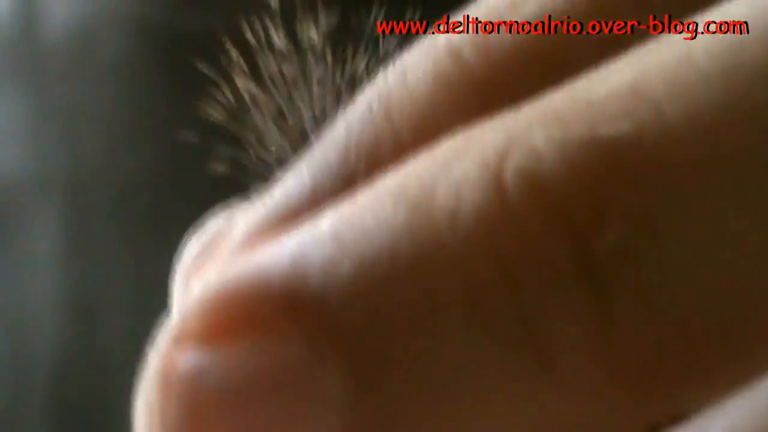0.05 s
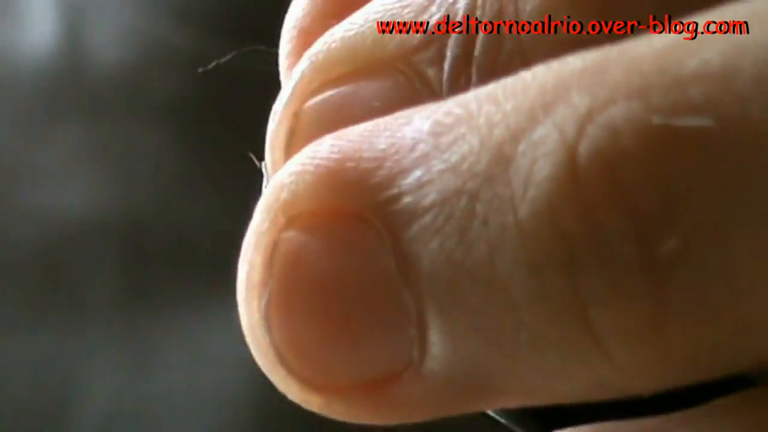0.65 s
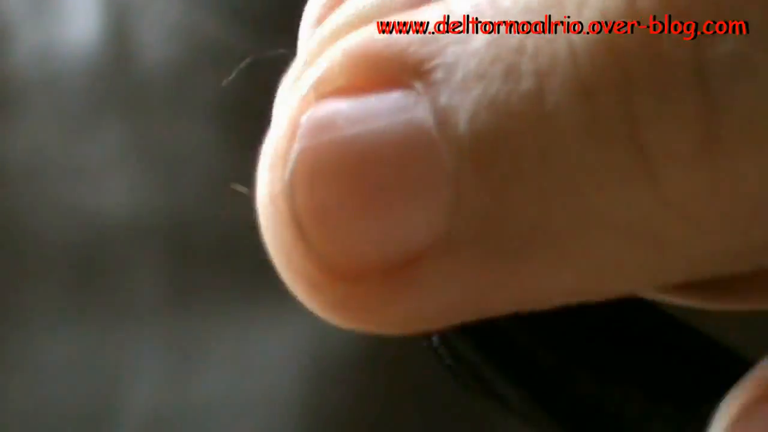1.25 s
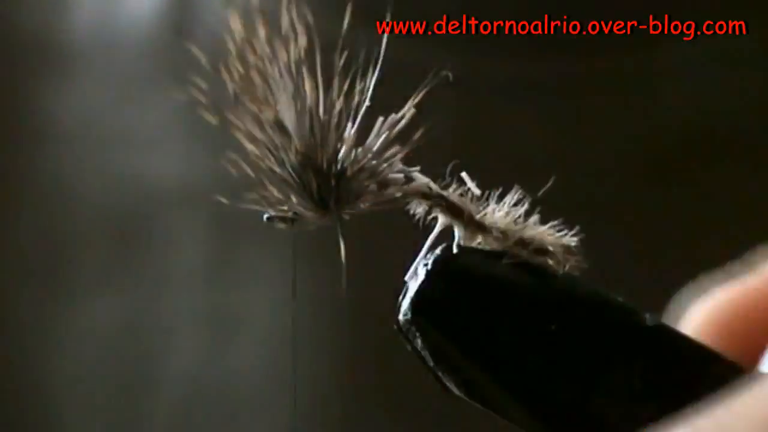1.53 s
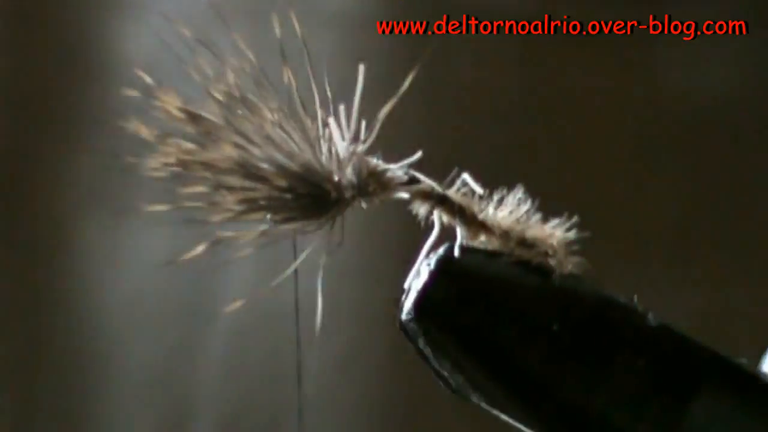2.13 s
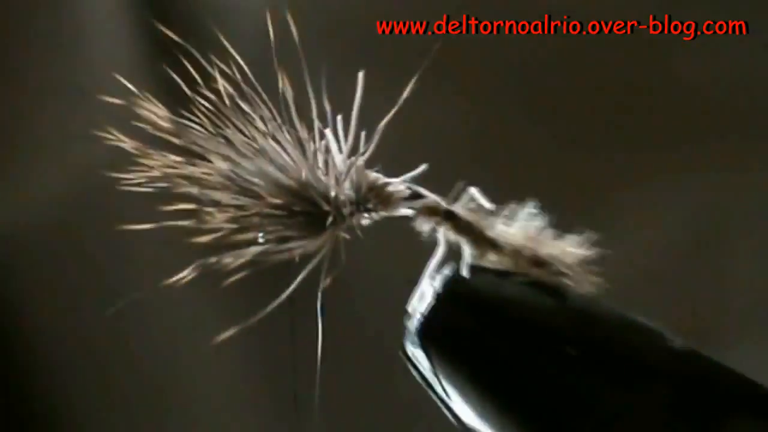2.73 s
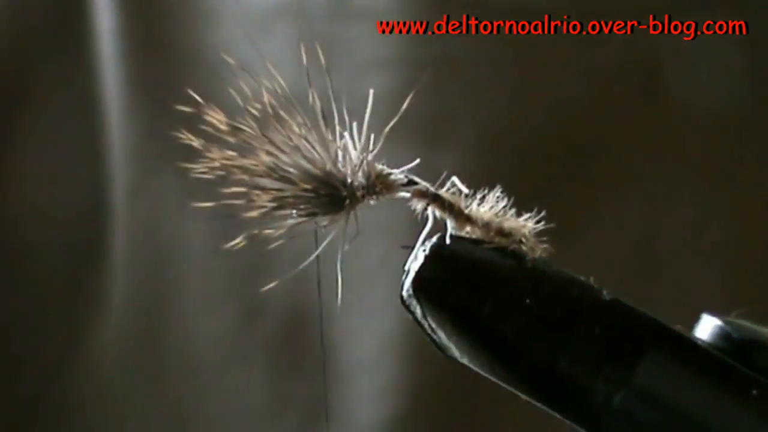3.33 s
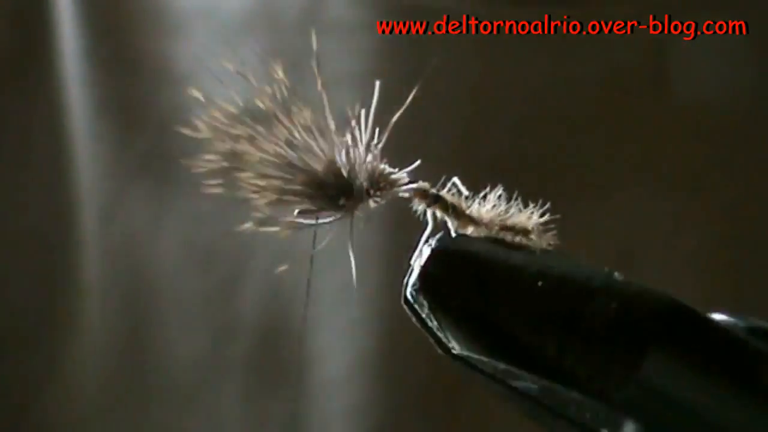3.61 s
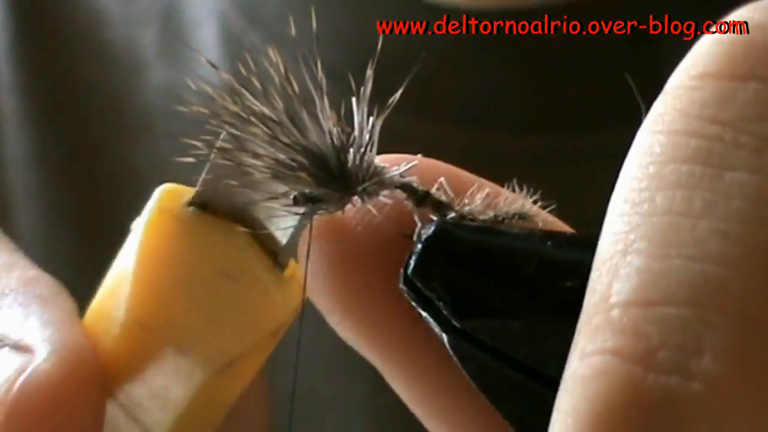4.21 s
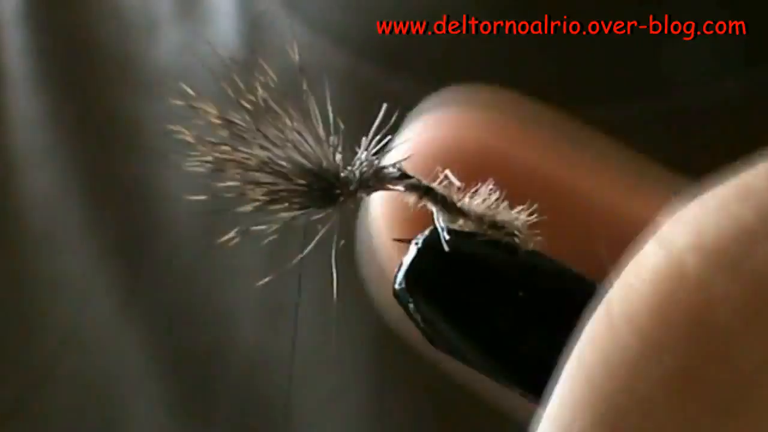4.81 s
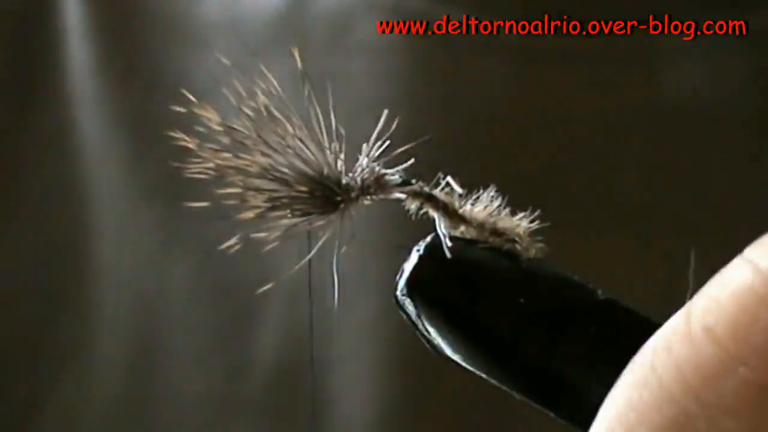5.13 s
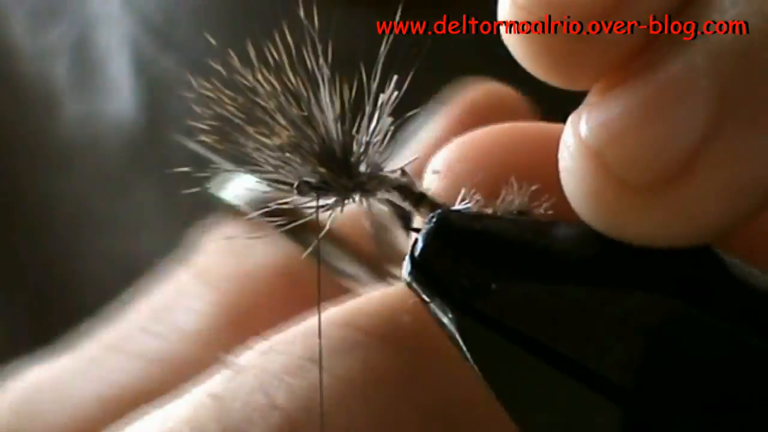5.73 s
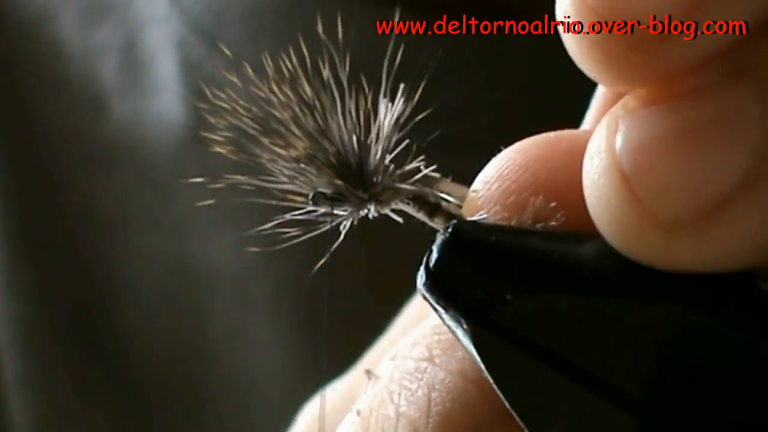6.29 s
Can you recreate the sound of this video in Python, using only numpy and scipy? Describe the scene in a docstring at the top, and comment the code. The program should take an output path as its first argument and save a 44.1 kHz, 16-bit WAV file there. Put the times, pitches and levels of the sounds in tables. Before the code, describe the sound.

A quiet, fairly dry room with a soft rumble and faint high pips is heard through two spaced microphones. From about 0.6 to 0.8 seconds comes the loudest event: small metal tools drag and clatter on a table, chattering over dull thuds and cutting off abruptly. Light ticks and soft knocks follow at about 1, 1.3 and 1.9 seconds. Between 2.3 and 3.2 seconds there is faint, dull rubbing with small clicks and two brief hisses of gliding metal. Sharper, briefly ringing taps and tiny slides run from 3.2 to 3.9 seconds, ending in another fine hiss. A few thin ticks lead to a tabletop thud at 4.8 seconds. From 5 to 5.3 seconds a second loud clatter of short scrapes and knocks follows. After one soft knock near 5.5 seconds, only the room remains until about 6.4 seconds.

```python
"""Small metal tools are picked up, dragged and put down on a table beside a fly-tying vise.
A sliding tool chatters, and the sound cuts off abruptly. Single contacts tick and ring briefly,
and the tabletop thuds under them. Things rub softly, and gliding metal hisses.
The room is quiet and fairly dry, with a soft rumble and faint high pips; two spaced microphones hear it."""
import sys
import numpy as np
from scipy import signal
from scipy.fft import rfft, irfft
from scipy.io import wavfile
from scipy.ndimage import uniform_filter1d

SR = 44100
rng = np.random.default_rng(int(sys.argv[2]) if len(sys.argv) > 2 else 0)


def transcribe(signal):
    """Save signal, clipped to [-1, 1], as a 16-bit WAV file at the path in sys.argv[1]."""
    frames = np.atleast_2d(signal).T
    limited = np.clip(frames, -1, 1)
    pcm = np.round(limited * 32767).astype(np.int16)
    wavfile.write(sys.argv[1], SR, pcm)


N = 280476

# Single contacts of a tool. Each row: start in seconds, seconds to fade by 60 dB, level in dB,
# wooden lows in dB, steely highs in dB, ring pitch in Hz, ring strength in dB.
CONTACTS = [(0.6496, 0.04, -21.5, 7, 0, 1960, 13), (0.6785, 0.016, -19.5, 10.5, -13, 2145, 18.5),
            (0.796, 0.036, -24, 4, -10, 953, 19), (1.0146, 0.036, -34.5, 7, 13, 4170, 14.5),
            (1.346, 0.075, -52, 15, 16, 9000, 6), (1.924, 0.069, -49.5, 29, 16, 3010, 14),
            (2.344, 0.088, -43.5, 24.5, 18, 855, 8.5), (2.371, 0.044, -45, -19, -34, 2540, 13),
            (2.526, 0.054, -51, 3, -1, 2440, 15), (2.554, 0.028, -39.5, -12, -10, 1860, 13),
            (2.686, 0.07, -42.5, -10, -29, 2340, 13), (2.849, 0.029, -53.5, -4, 7, 4350, 5),
            (3.048, 0.036, -57.5, 3, 32, 860, 16), (3.27, 0.064, -32.5, 7.5, -10, 1126, 17.5),
            (3.381, 0.086, -37, 23, -24, 1060, 9.5), (3.606, 0.031, -44, 11, -18, 1970, 13),
            (3.671, 0.021, -35, -5, 9.5, 2925, 20), (3.684, 0.045, -41.5, 6, 14.5, 6800, 7),
            (3.781, 0.048, -39.5, -14, 18.5, 7560, 9.5), (3.928, 0.052, -52, 10, 0, 4000, 22),
            (4.137, 0.033, -49.5, -3, 18, 5470, 11.5), (4.528, 0.026, -47.5, -38, 21.5, 4070, 16),
            (4.728, 0.032, -42, 2, 18.5, 3640, 17), (4.96, 0.12, -50, -9, 8, 3920, 14),
            (5.188, 0.074, -29.5, 9.5, 1.5, 1110, 12), (5.461, 0.075, -48.5, 19.5, 18, 7440, 5)]


def amp(db):
    """Turns decibels into a gain."""
    return 10 ** (np.asarray(db) / 20)


def evened(x):
    """Scales a signal to an average (rms) level of 1."""
    return x / np.sqrt(np.mean(x ** 2) + 1e-20)


def read(points, hz):
    """Reads between the rows of a table, on a log-frequency axis."""
    f, value = np.transpose(points)
    return np.interp(np.log(hz + 1), np.log(f + 1), value)


def add(mix, start, sound):
    """Mixes a stereo sound in at a start time in seconds."""
    part = mix[:, max(round(start * SR), 0):][:, :sound.shape[1]]
    part += sound[:, :part.shape[1]]


def tint(x, gain_db, size=4096):
    """Filters a sound by a curve that gives dB for each frequency."""
    cepstrum = irfft(np.log(amp(gain_db(np.fft.rfftfreq(size, 1 / SR)))))
    # folded so that the filter rings only after a blow, never before it
    cepstrum[1:size // 2] *= 2
    cepstrum[size // 2 + 1:] = 0
    response = irfft(np.exp(rfft(cepstrum)))
    return signal.fftconvolve(x, response[None], axes=1)[:, :x.shape[1]]


def peak(f, hz, width):
    """The power of one resonance, 1 at its centre."""
    return 1 / (1 + (2 * (f - hz) / width) ** 2)


def placed(x, db, pan_db, span):
    """Sets the level over the first span seconds, and how much louder the left side is."""
    rms = np.sqrt(np.mean(x[:, :round(span * SR)] ** 2, axis=1, keepdims=True))
    return x / rms * amp(db + np.array([[pan_db], [-pan_db]]) / 2)


def held(t, length, rise, stop):
    """A level that rises, holds and falls away; all times are in seconds."""
    return np.minimum(t / rise, 1) * np.exp(-np.maximum(t - length, 0) / stop)


def grainy(grain_db, size=300):
    """Noise whose strength flickers, in grains about size samples long."""
    noise, bumps = rng.standard_normal((2, N)), rng.standard_normal(N)
    return noise * amp(grain_db * evened(uniform_filter1d(bumps, size)))


def background(level_db=-57.3, patchy_db=1.18, lumpy_db=0.8, rumble_hz=300):
    """The room hisses softly over a rumble that comes in lumps."""
    # The room at rest. Each row: frequency in Hz, relative level in dB.
    colour = [(25, -24), (60, 5.5), (110, -0.5), (200, 2.5), (340, -12.5), (520, -9.5), (760, -6),
              (970, -2.5), (1250, -8), (2000, -11), (3700, -16.5), (4900, -15.5), (7000, -19.5),
              (15000, -25.5)]
    # How alike the two sides are. Each row: frequency in Hz, likeness from 0 to 1.
    likeness = [(50, 0.96), (200, 0.32), (450, 0.066), (1500, 0.22), (4000, 0.046)]
    frames, hz = N // 256 + 5, np.fft.rfftfreq(1024, 1 / SR)
    a, b, c, d, patches = rng.standard_normal((5, frames, len(hz))).transpose(0, 2, 1)
    patches = uniform_filter1d(patches, size=16, axis=0)  # smooth across frequency
    patches = evened(uniform_filter1d(patches, size=12, axis=1))  # and across time
    same = np.clip(read(likeness, hz), -1, 1)[:, None]
    left = a + 1j * b
    right = same * left + np.sqrt(1 - same ** 2) * (c + 1j * d)
    depth_db = patchy_db + lumpy_db / (1 + (hz / rumble_hz) ** 4)
    spectra = np.array([left, right]) * amp(read(colour, hz)[:, None] + depth_db[:, None] * patches)
    return amp(level_db) * evened(signal.istft(spectra, nperseg=1024, noverlap=768)[1][:, :N])


def pips(hz=2395, spread_hz=30, length=0.022, clear_db=-53.5, weak_db=-59, weak_count=22,
         phase_spread=0.27, octave_db=-18, flutter_db=-71, flutter_width_hz=110):
    """Short soft tones, all near one pitch, sound over a faint flutter at that pitch."""
    # The clearest pips. Each entry: the middle of a pip in seconds.
    times = [0.249, 0.378, 0.998, 1.184, 1.438, 1.484, 1.67, 1.782, 1.805, 1.847, 1.974, 2.0, 2.033, 2.296,
             3.231, 3.554, 3.733, 5.452, 5.659]
    out, t = np.zeros((2, N)), np.arange(round(length * SR)) / SR
    events = [(middle, clear_db) for middle in times]
    events += [(middle, weak_db) for middle in rng.uniform(times[0], times[-1], weak_count)]
    for (middle, db), (detune, left, right) in zip(events, rng.standard_normal((len(events), 3))):
        angle = 2 * np.pi * (hz + spread_hz * detune) * t + phase_spread * np.array([[left], [right]])
        tone = np.sin(angle) + amp(octave_db) * np.sin(2 * angle)
        add(out, middle - length / 2, amp(db) * tone * np.hanning(len(t)))
    flicker = grainy(grain_db=5.5, size=700)
    flutter = tint(flicker, lambda f: np.maximum(20 * np.log10(peak(f, hz, flutter_width_hz)), -80))
    return out + amp(flutter_db) * evened(flutter)


def scatter(t, fade_s):
    """Dense echoes from the table and the things on it, different at each microphone."""
    return rng.standard_normal((2, len(t))) * amp(-60 * t / fade_s)


def chatter(t, slips_per_s=4500, spread_db=3.5, fade_s=0.012, dwell_s=0.017, lowest_hz=170):
    """A sliding tool catches and slips in quick uneven blows; each spot it passes echoes differently."""
    chance, size, sign = rng.random((3, SR // 2))[:, :len(t)]
    strength = amp(spread_db * np.minimum(-np.log(size), 3))
    slips = (chance < slips_per_s / SR) * strength * np.sign(sign - .5)
    spot = np.floor(t / dwell_s)
    echoes = [scatter(t[:800], fade_s) for _ in range(20)]
    blows = sum(signal.fftconvolve((slips * (spot == k))[None], echo, axes=1)
                for k, echo in enumerate(echoes))
    return signal.sosfilt(signal.butter(2, lowest_hz, "high", fs=SR, output="sos"), blows[:, :len(t)])


def tool_ring(blows, low_db, high_db, ring_hz, ring_db, ring_q=26, grip_hz=70, modes_db=2,
              overtone=1.47, overtone_db=-8):
    """Blows ring the tool, the table and two resonances of the spot struck; the grip damps them all."""
    # Resonances of tools on the table. Each row: pitch in Hz, undamped width in Hz, relative dB.
    resonances = [(955, 27, -18), (2112, 120, 0), (2740, 63, -2), (2940, 180, -1.5), (3860, 130, -6),
                  (4150, 23.7, -13), (4790, 210, -2), (4930, 170, -10), (5250, 120, -9.5), (6500, 210, -4)]
    # The tone colour of a contact. Each row: frequency in Hz, relative level in dB.
    colour = [(120, -4.5), (260, -5.5), (380, -15.5), (500, -6.5), (630, -9.5), (1000, 4), (1600, -0.5),
              (2100, 0.5), (2700, -1.5), (4500, -3.5), (6500, -9.5), (10000, -19.5), (12500, -31.5),
              (16000, -38)]

    def gain_db(f):
        modes = sum(amp(db + modes_db) ** 2 * peak(f, hz, width + grip_hz)
                    for hz, width, db in resonances)
        width = ring_hz / ring_q + grip_hz
        ring = peak(f, ring_hz, width) + amp(overtone_db) ** 2 * peak(f, ring_hz * overtone, width)
        # a light, hard contact is brief, so its lift keeps growing toward the top
        hardness = [(600, low_db), (1700, 0.019), (3400, 0.022), (8500, high_db), (13000, 1.24 * high_db)]
        return read(colour, f) + read(hardness, f) + 10 * np.log10(1 + modes + amp(ring_db) ** 2 * ring)
    return tint(blows, gain_db)


def recoloured(x, times, lows_db, highs_db, wood_hz=(250, 1100), steel_hz=(6000, 14000)):
    """Moves the shares of wooden lows and steely highs along their curves."""
    f, t, spectra = signal.stft(x, SR, nperseg=256)
    power, gain_db = (abs(spectra) ** 2).sum((0, 2)), 0
    wood_reach = read([(480, 1), (1500, 0)], f)
    steel_reach = read([(2600, 0), (9000, 1)], f)
    for (lo, hi), share_db, reach in ((wood_hz, lows_db, wood_reach), (steel_hz, highs_db, steel_reach)):
        plain_db = 10 * np.log10(power[(f > lo) & (f < hi)].sum() / power.sum())
        gain_db = gain_db + reach[:, None] * (np.interp(t, times, share_db) - plain_db)
    return signal.istft(spectra * amp(gain_db), SR, nperseg=256)[1][:, :x.shape[1]]


def table_swing(t, hz, knock_db=-8, knock_reach=1.704, left_lead_s=0.0012):
    """The tabletop swings with a dull knock; the left microphone hears the swing slightly sooner."""
    tone = np.sin(2 * np.pi * hz * (t + np.array([[left_lead_s], [-left_lead_s]]) / 2))
    band = signal.butter(4, [hz * 0.65, hz * knock_reach], "band", fs=SR, output="sos")
    knock = signal.sosfilt(band, rng.standard_normal((2, SR // 2)))[:, -len(t):]
    return evened(tone + amp(knock_db) * evened(knock))


def drags(level_db=4.0, low_db=1, high_db=-2, rise=0.00045, stop=0.003, table_db=-36.5, give_db=-29):
    """A dragged tool chatters and swings the tabletop under it; the sound cuts off abruptly."""
    # One curve for each drag. Each row of a curve: time in seconds, relative level in dB,
    # share of wooden lows in dB, share of steely highs in dB.
    curves = [
        [(0.562, -38, 14, -4), (0.57, -15.5, -9, -7.5), (0.588, -28.5, 3.5, 2.5), (0.608, -39, -8, -4)],
        [(0.649, -24, 10.5, -13), (0.653, -19.5, -5.5, -14.5), (0.693, -25.5, -7, -14.5),
         (0.705, -19.5, -16, -18), (0.747, -20.5, -8.5, -9.5), (0.767, -28.5, -10, -21),
         (0.777, -17.5, -6, -20.5), (0.801, -25.5, 0.5, -28), (0.816, -26, -1.5, -20)],
        [(4.976, -35, -14, -25), (4.984, -29.5, -15, -12.5), (5.002, -32.5, 4, -9), (5.013, -28.5, 1.5, -19)],
        [(5.019, -24, -3, -9), (5.027, -17.5, -10, -14.5), (5.061, -23.5, -4, -5.5)],
        [(5.215, -31, -9, -21), (5.223, -23.5, -3.5, -28), (5.231, -26.5, -4.5, -16.5), (5.241, -36, -1.5, -28),
         (5.272, -46.5, -4, -15)],
    ]
    # The spot under each drag. Each row: ring pitch in Hz, ring strength in dB,
    # left over right in dB, tabletop pitch in Hz.
    spots = [(2155, 14.5, 4, 168), (1960, 8.5, 0.6, 180), (1560, 13.5, 1, 280), (2190, -1, 0.7, 177),
             (903, 8.5, -1, 185)]
    out = np.zeros((2, N))
    for curve, (ring_hz, ring_db, pan_db, table_hz) in zip(curves, spots):
        seconds, db, lows_db, highs_db = np.transpose(curve)
        times, length = seconds - seconds[0], seconds[-1] - seconds[0]
        t = np.arange(round((length + .06) * SR)) / SR
        level = amp(np.interp(t, times, db)) * held(t, length, rise, stop)
        rasp = tool_ring(chatter(t), low_db, high_db, ring_hz, ring_db)
        rasp = recoloured(rasp, times, lows_db, highs_db)
        give = amp(table_db) * np.tanh(level / amp(give_db))  # the tabletop gives only so far
        table = table_swing(t, table_hz, knock_db=-3, knock_reach=3.2) * give
        add(out, seconds[0], placed(rasp, level_db, pan_db, length) * level + table)
    return out


def thuds(fade_s=0.74, rise=0.0044, stop=0.0047, tap_db=-18.0, wood_share=0.43, tap_s=0.021, tap_hz=225):
    """The tabletop thuds at each landing, holds briefly, then cuts off."""
    # A hand or tool lands. Each row: start in seconds, length in seconds, level in dB, pitch in Hz.
    landings = [(0.578, 0.023, -30, 162), (0.775, 0.0095, -21.5, 188), (0.8, 0.016, -29.5, 179),
                (1.126, 0.039, -50.5, 181), (1.351, 0.012, -39.5, 184), (1.918, 0.024, -43, 214.7),
                (3.264, 0.038, -45, 263), (3.604, 0.021, -50, 300), (3.932, 0.15, -58.5, 195),
                (4.525, 0.028, -49.5, 182), (4.805, 0.037, -32.5, 142), (4.974, 0.085, -34, 277),
                (5.303, 0.033, -44.5, 172.5), (5.443, 0.038, -45, 184)]
    out, t = np.zeros((2, N)), np.arange(SR // 4) / SR
    # every tap thuds too, and a woodier tap thuds more
    under_taps = [(start, tap_s, db + tap_db + wood_share * low_db, tap_hz)
                  for start, _, db, low_db, *_ in CONTACTS]
    for start, length, db, hz in landings + under_taps:
        level = held(t, length, rise, stop) * amp(-60 * t / fade_s)
        add(out, start, placed(table_swing(t, hz) * level, db, 0, length))
    return out


def nudges(rise=0.0042, stop=0.0045, pan_db=0.2):
    """A tool chatters briefly as it slides a little way under light, even pressure."""
    # Short slides. Each row: start in seconds, length in seconds, level in dB, wooden lows in dB,
    # steely highs in dB, ring pitch in Hz, ring strength in dB.
    slides = [(0.614, 0.028, -38.5, 12, 2, 1920, 21), (3.251, 0.04, -38, -8, 1, 1207, 15.5),
              (3.298, 0.043, -52.5, 15, 14, 4600, 8), (3.587, 0.043, -48, 15.5, 4, 3900, 7),
              (3.771, 0.014, -39, 5, 18, 4200, 23), (4.521, 0.0087, -43.5, -16, 11.5, 4140, 25),
              (4.77, 0.04, -53.5, 14, -1.5, 1080, 8), (4.89, 0.024, -52.5, -11, 8, 2390, 6),
              (5.064, 0.034, -47, 5, 3, 1137, 0.5), (5.14, 0.024, -43.5, 10, -15, 1030, 21)]
    out = np.zeros((2, N))
    for start, length, db, low_db, high_db, ring_hz, ring_db in slides:
        t = np.arange(round((length + .06) * SR)) / SR
        rasp = tool_ring(chatter(t), low_db, high_db, ring_hz, ring_db)
        add(out, start, placed(rasp * held(t, length, rise, stop), db, pan_db, length))
    return out


def taps(attack_s=0.00124, span_s=0.013, crack_db=7, pan_db=-0.5):
    """Each hard contact makes a direct crack, then scattered echoes and a brief ring of the loose tool."""
    out, t = np.zeros((2, N)), np.arange(SR // 6) / SR
    for start, fade_s, db, low_db, high_db, ring_hz, ring_db in CONTACTS:
        blow = scatter(t, fade_s) * (1 - np.exp(-t / attack_s))
        blow[:, round(attack_s * SR)] += amp(crack_db)
        tick = tool_ring(blow, low_db, high_db, ring_hz, ring_db,
                         ring_q=35, grip_hz=35, overtone=2.29, overtone_db=-10.5)
        add(out, start, placed(tick, db, pan_db, span_s))
    return out


def rubs(width_hz=500, grain_db=2):
    """Friction on the rough tabletop swells and fades through one broad resonance: a dull rustle."""
    # Light rubs. Each row: middle in seconds, length in seconds, top level in dB, centre in Hz.
    strokes = [(2.432, 0.06, -48.5, 940), (2.512, 0.084, -54, 885), (2.584, 0.14, -51, 1330),
               (2.715, 0.13, -58, 1440), (2.846, 0.57, -57.5, 1120), (2.948, 0.072, -51, 690),
               (3.084, 0.19, -54.5, 765), (3.189, 0.072, -57.5, 695)]
    out, friction = np.zeros((2, N)), grainy(grain_db)
    for middle, length, db, hz in strokes:
        start, swell = middle - length / 2, np.hanning(round(length * SR))
        noise = friction[:, round(start * SR):][:, :len(swell)]
        rustle = tint(noise, lambda f: 20 * np.log10(peak(f, hz, width_hz)))
        add(out, start, evened(rustle) * swell * amp(db))
    return out


def glides(level_db=-1.0, grain_db=2, rise=0.012, stop=0.032):
    """Smooth metal glides, and its friction makes a fine hiss."""
    # Gliding strokes. Each row: start in seconds, length in seconds, relative level in dB.
    strokes = [(2.488, 0.11, -58), (2.669, 0.15, -58.5), (3.79, 0.15, -55)]
    # The tone colour of the hiss. Each row: frequency in Hz, relative level in dB.
    colour = [(1500, -17), (3000, -14), (4500, -7), (6300, -10), (6750, -3), (7250, -12), (9300, -11.5),
              (11000, -20), (16000, -28)]
    t = np.arange(N) / SR
    level = sum(amp(db) * held(np.maximum(t - start, 0), length, rise, stop)
                for start, length, db in strokes)
    hiss = tint(grainy(grain_db), lambda f: read(colour, f))
    return evened(hiss) * level * amp(level_db)


def room(x):
    """The room adds a smooth tail of echoes, each band dying away at its own speed."""
    # How long the room rings. Each row: frequency in Hz, seconds to fade by 60 dB.
    fades = [(150, 0.34), (1000, 0.49), (4000, 0.4), (12000, 0.25)]
    hz, t, spectra = signal.stft(rng.standard_normal((2, SR // 2)), SR, nperseg=256)
    tail = signal.istft(spectra * amp(-60 * t / read(fades, hz)[:, None]), SR, nperseg=256)[1]
    return signal.fftconvolve(x, tail / np.linalg.norm(tail[0]), axes=1)[:, :N]


def scene(tool_room_db=-30, thud_room_db=-24):
    """Mixes the tools, the table and their weak echo with the quiet sounds around them."""
    tools = drags() + nudges() + taps()
    table = thuds()
    echo = room(amp(tool_room_db) * tools + amp(thud_room_db) * table)
    return tools + table + echo + rubs() + glides() + pips() + background()


def record(dry):
    """Cuts off the very highest treble."""
    lowpass = signal.firwin(511, cutoff=15950, window=("kaiser", 9), fs=SR)
    return signal.oaconvolve(dry, lowpass[None], "same")


dry = scene()
out = record(dry)
transcribe(out)
```